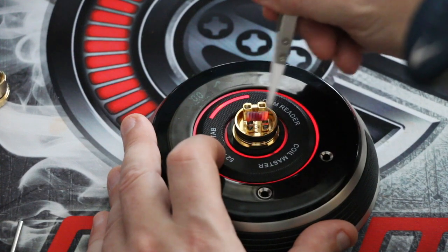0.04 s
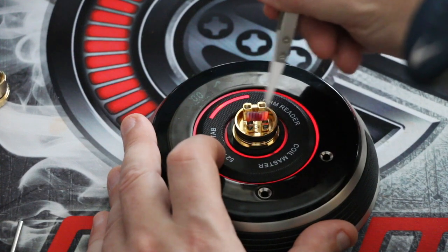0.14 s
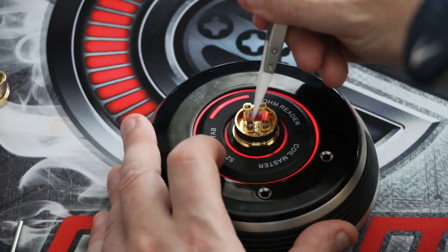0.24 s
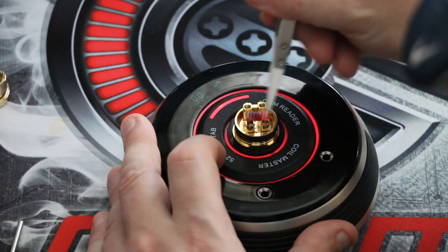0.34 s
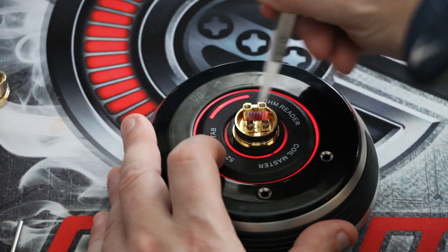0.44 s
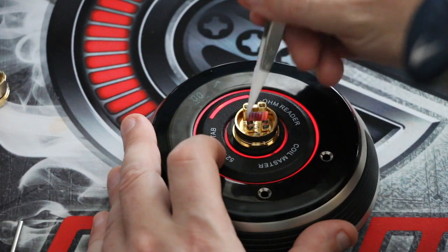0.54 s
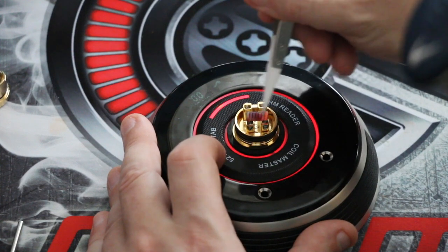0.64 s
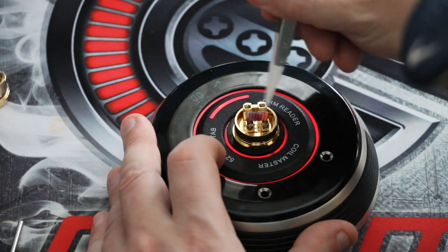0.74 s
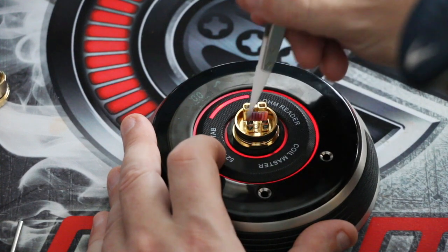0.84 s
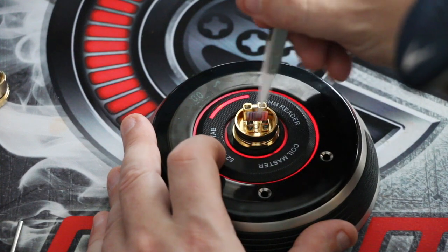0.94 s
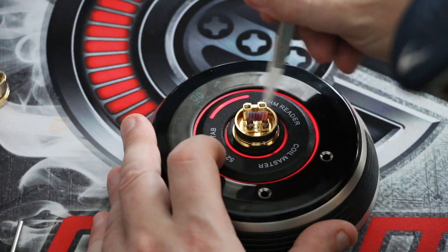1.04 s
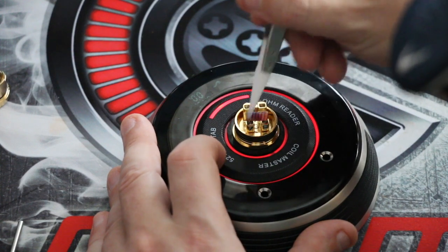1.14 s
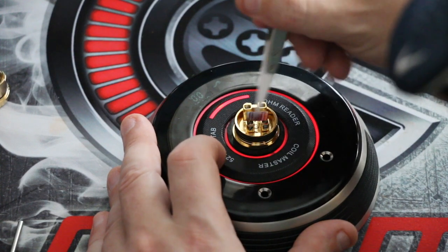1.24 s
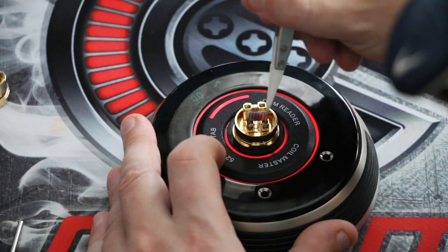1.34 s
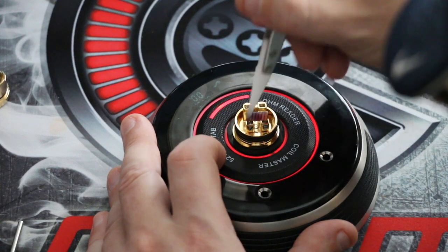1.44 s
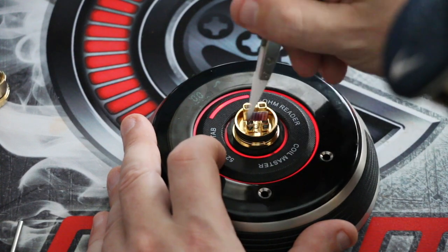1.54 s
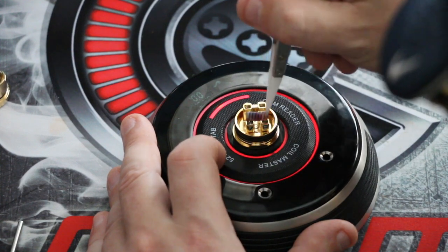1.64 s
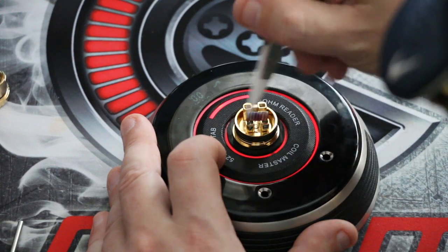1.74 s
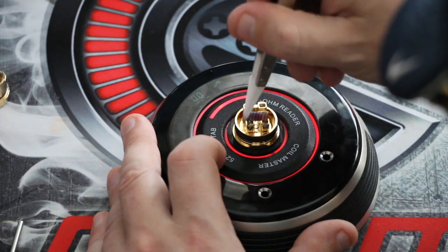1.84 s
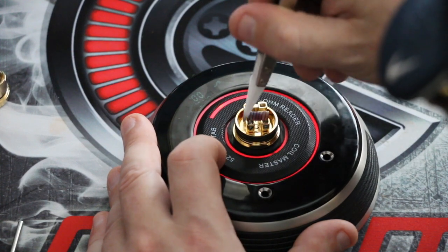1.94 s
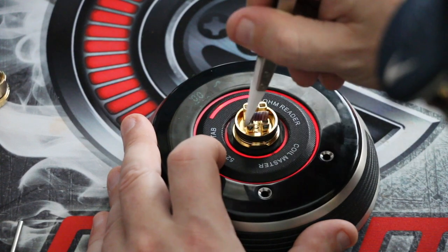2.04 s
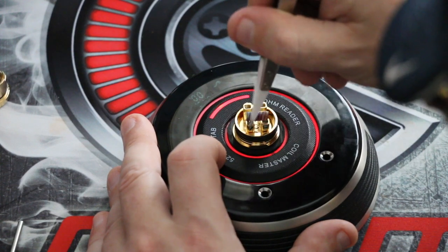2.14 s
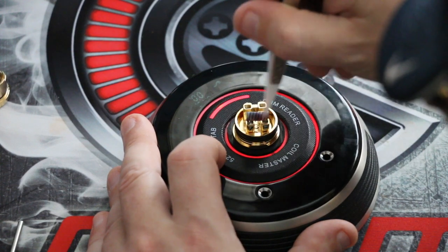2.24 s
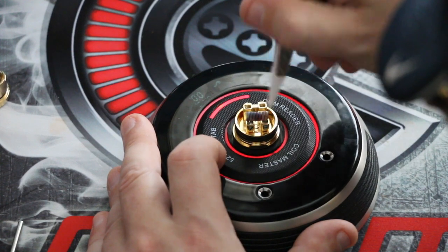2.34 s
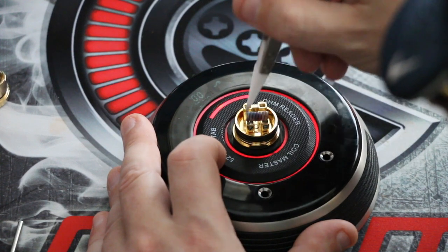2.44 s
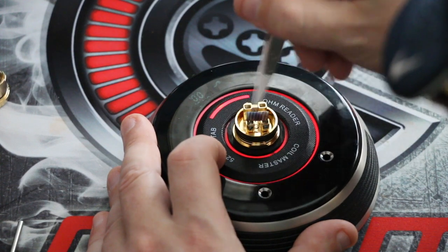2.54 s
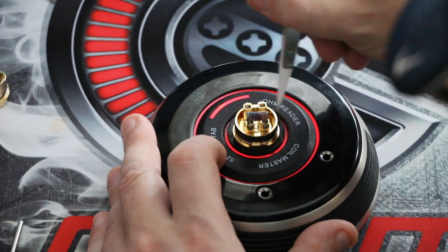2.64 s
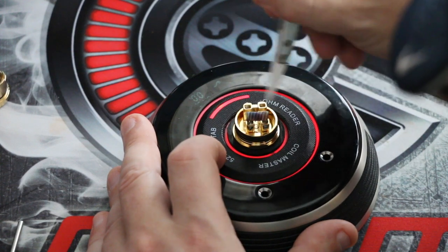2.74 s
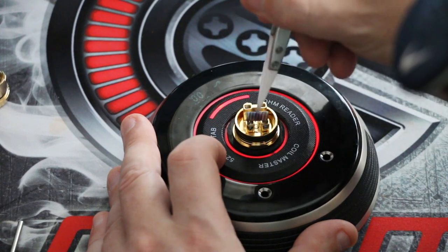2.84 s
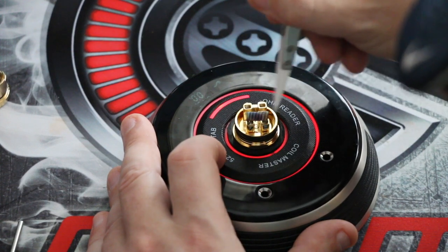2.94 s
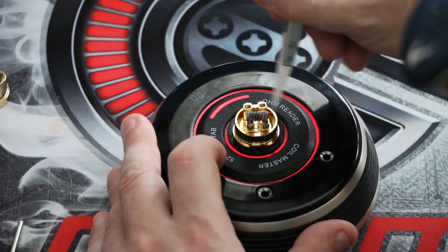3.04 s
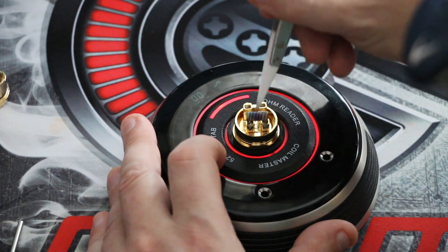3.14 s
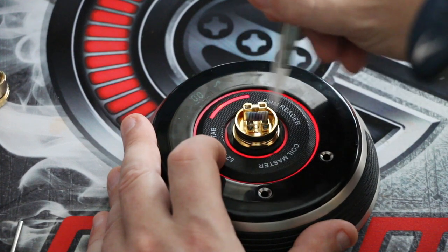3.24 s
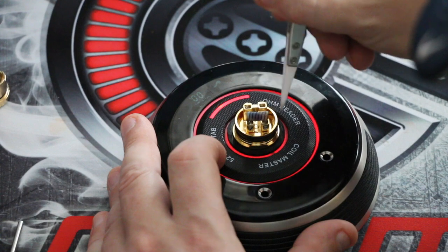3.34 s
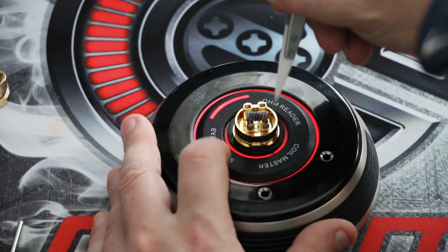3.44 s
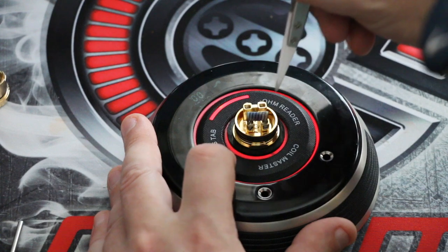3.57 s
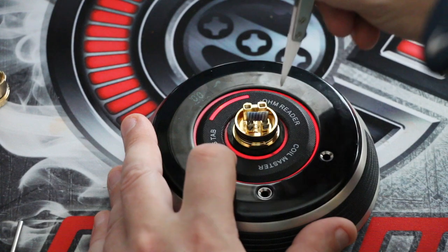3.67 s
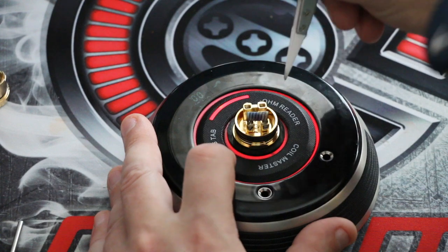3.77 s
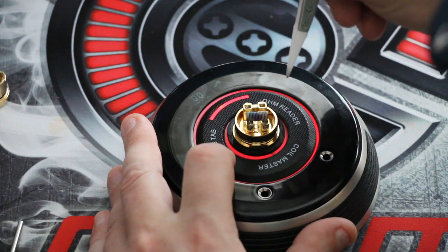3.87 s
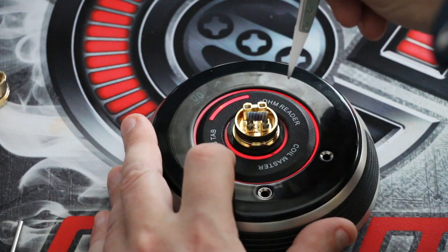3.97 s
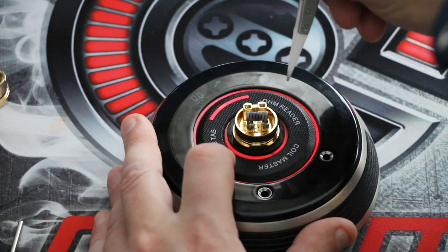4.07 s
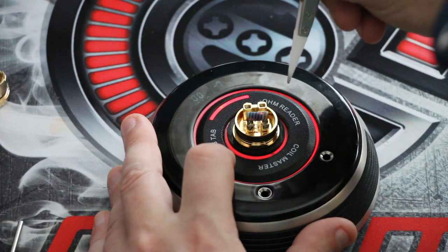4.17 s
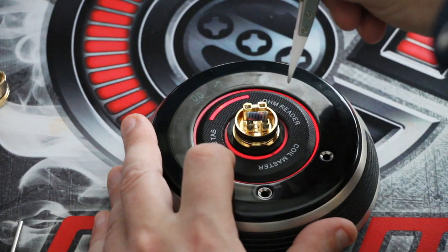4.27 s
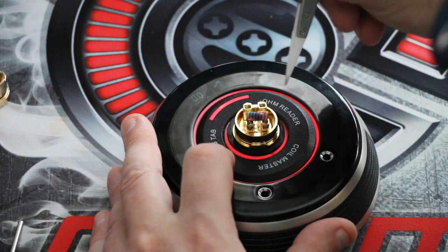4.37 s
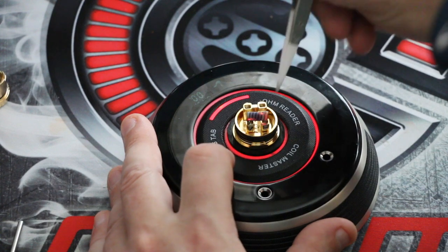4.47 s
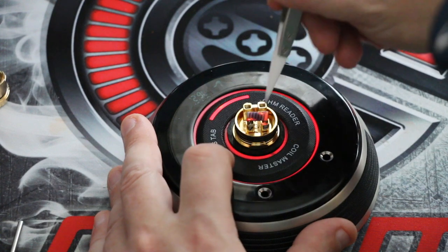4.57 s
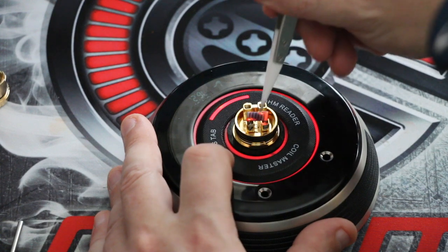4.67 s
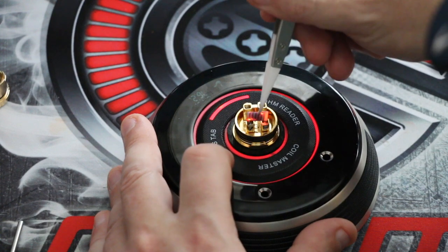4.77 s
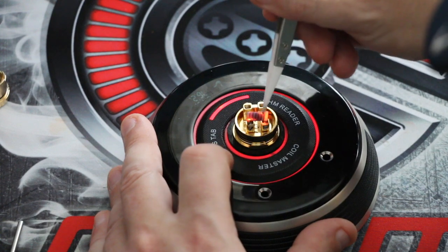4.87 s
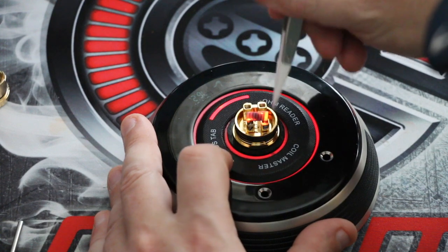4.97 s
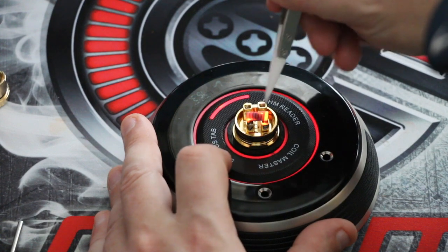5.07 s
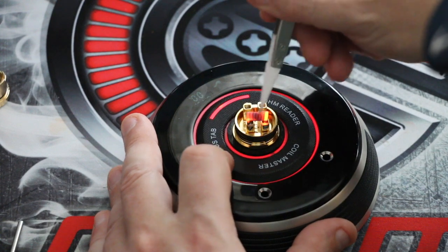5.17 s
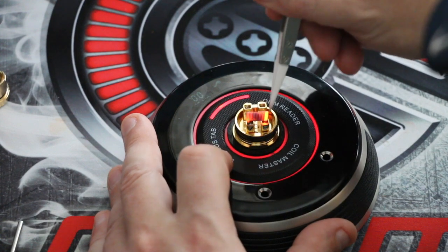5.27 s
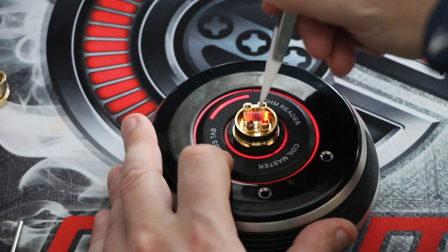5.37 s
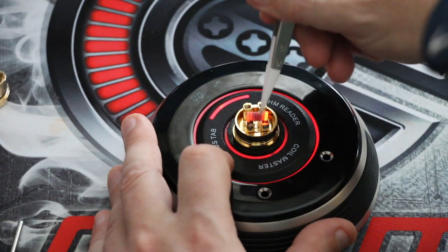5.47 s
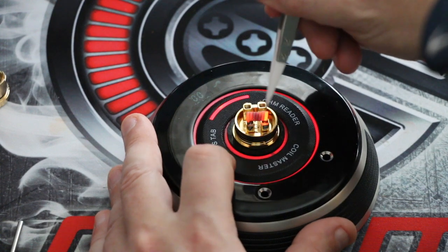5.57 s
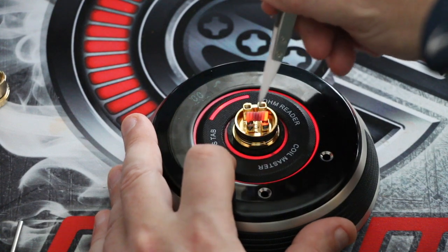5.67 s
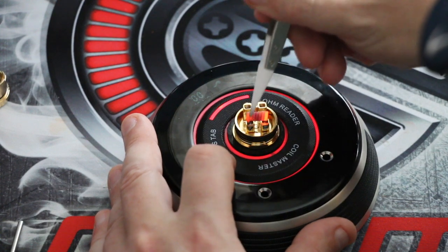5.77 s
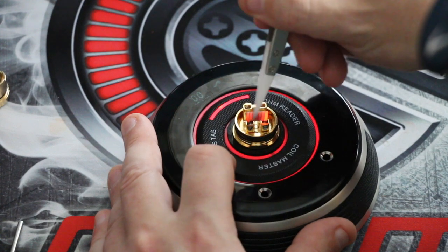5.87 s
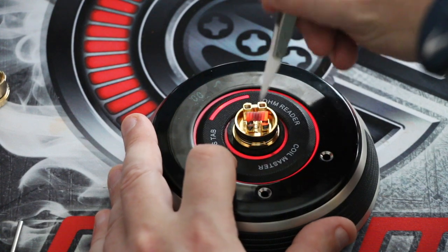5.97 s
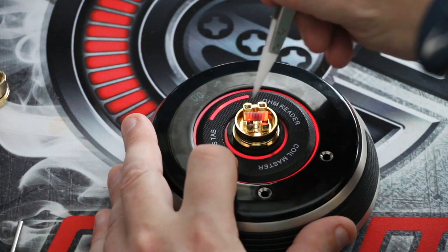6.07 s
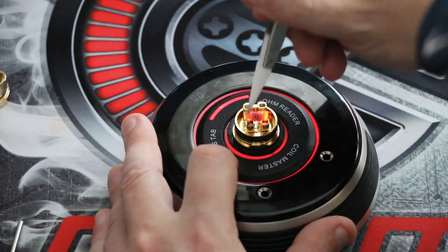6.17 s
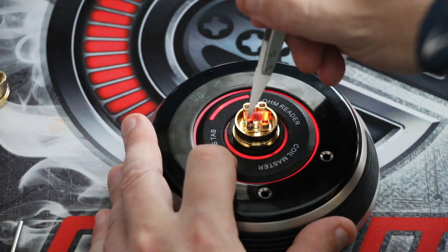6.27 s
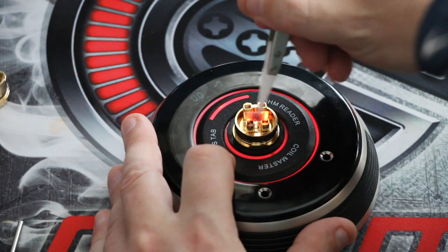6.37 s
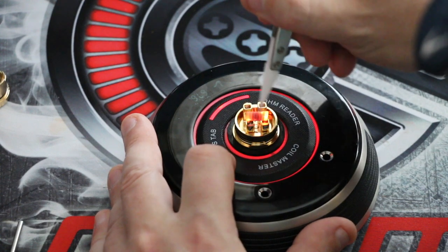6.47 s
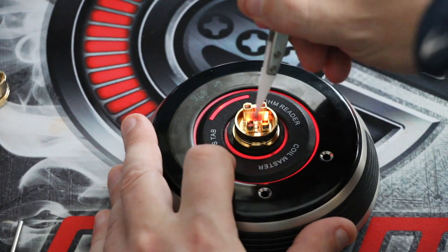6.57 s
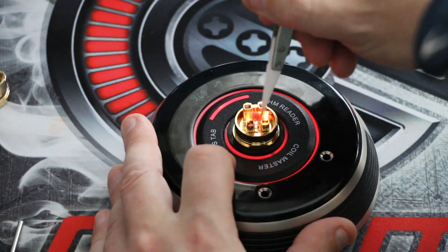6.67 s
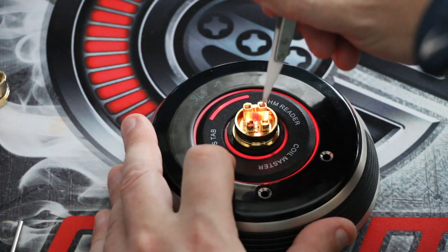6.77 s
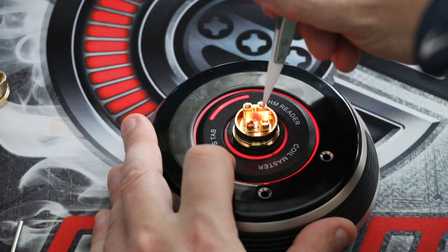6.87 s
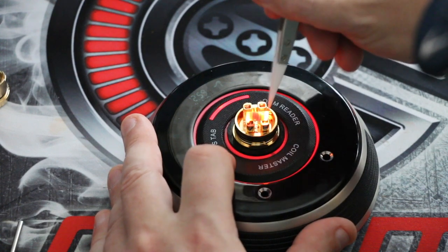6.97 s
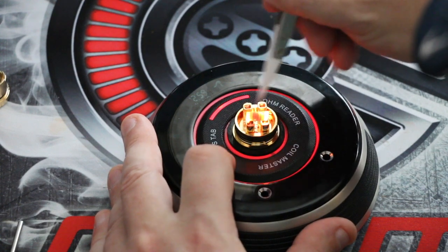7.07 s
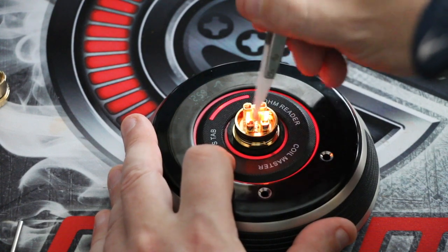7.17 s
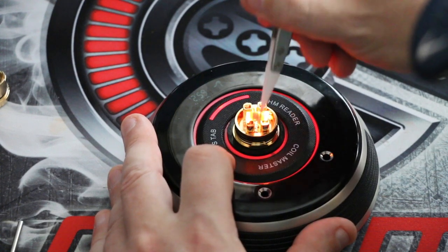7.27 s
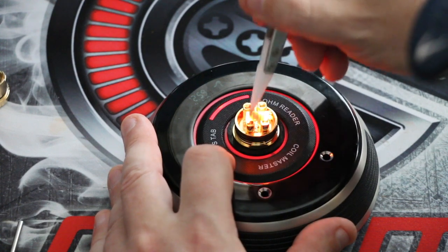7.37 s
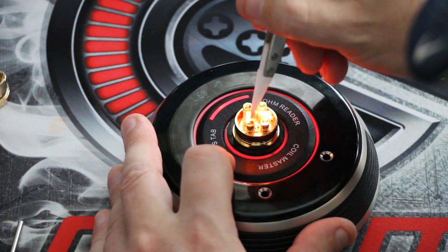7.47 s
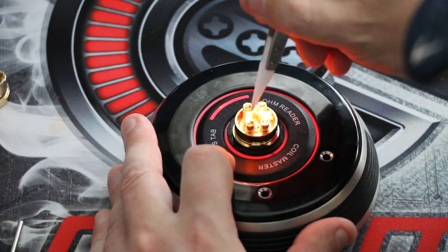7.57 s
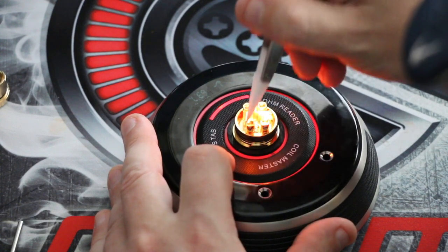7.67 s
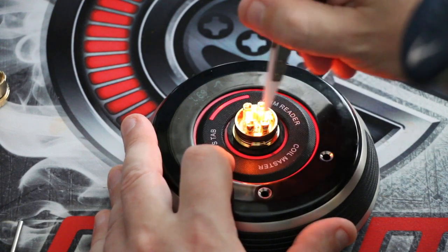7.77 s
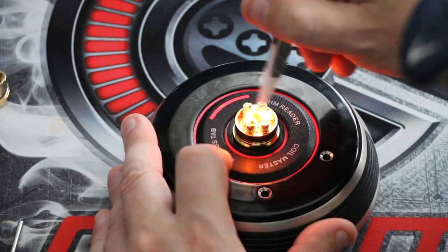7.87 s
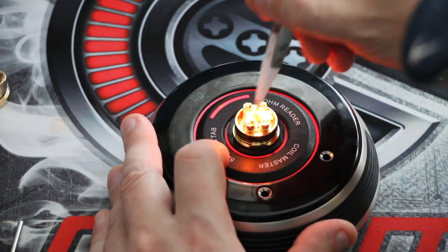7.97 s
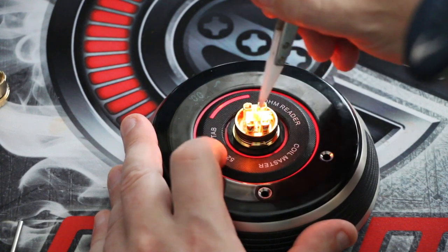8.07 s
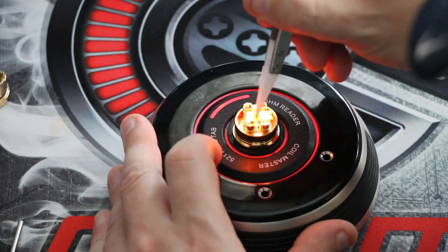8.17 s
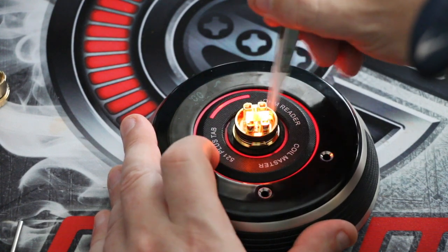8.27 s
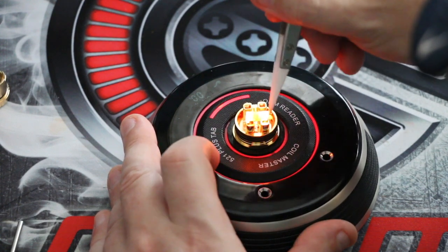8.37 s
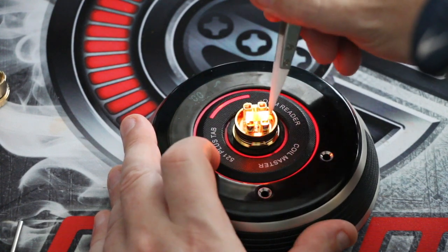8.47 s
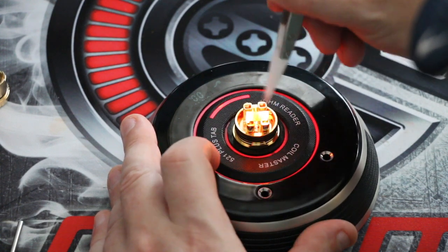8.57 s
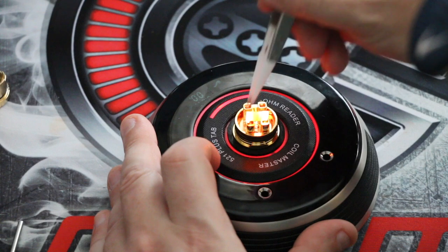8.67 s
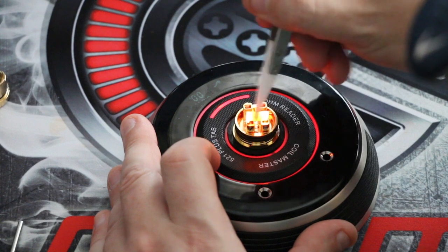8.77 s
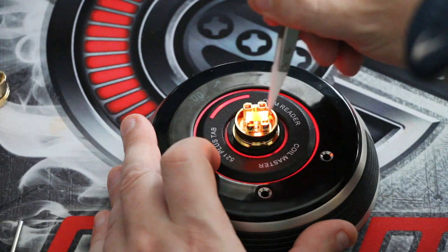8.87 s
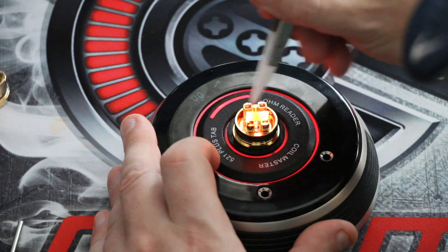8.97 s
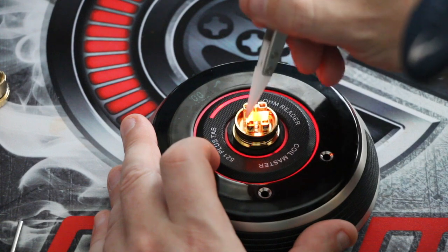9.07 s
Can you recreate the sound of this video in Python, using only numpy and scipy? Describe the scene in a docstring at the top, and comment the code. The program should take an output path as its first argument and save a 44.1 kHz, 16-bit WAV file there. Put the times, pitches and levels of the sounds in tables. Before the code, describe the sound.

Dry, gritty tick-scrape strokes repeat rapidly as tweezer tips rake a small metal coil, giving short wiry squeaks and low metallic rings. A pause of about a second and a half holds only dull finger knocks and a tiny tick. Then brighter, slightly less regular strokes return, thinning towards the end. Close microphone in a small room with faint rumble, hiss and hum.

```python
"""Small quiet room, close stereo microphone: ceramic-tipped tweezers strum a wire coil on a round firing base.
About three strokes a second with a pause midway: each taps down, skims, grips and rakes over the wraps.
Contact forces (impulses, stick-slip jerks, grit) pass through the room and the modes of wire and hollow base.
Short sagging tones, clean or rough, give wire squeaks, scrapes, low tweezer rings and a faint button tick.
A finger on the button knocks softly; shaped noise and sines give rumble, hiss and mains hum below."""
import sys
import numpy as np
from scipy import signal
from scipy.fft import rfft, irfft
from scipy.io import wavfile
from scipy.ndimage import uniform_filter1d

SR = 44100
rng = np.random.default_rng(int(sys.argv[2]) if len(sys.argv) > 2 else 0)


def wav_out(sig):
    """Save sig, one row per channel (or a flat mono array), as 16-bit PCM at SR to the path in sys.argv[1]."""
    wavfile.write(sys.argv[1], SR, np.round(np.clip(np.atleast_2d(sig).T, -1, 1) * 32767).astype(np.int16))


N = 402191

# tweezer strokes: start_s, tap_db, tap_bright_db, grip_wait_s, rake_s, rake_db, rake_bright_db, thump_db, hollow_db
STROKES = [(0.047, -35, -3.5, 0.028, 0.086, -39, -6, -6, -6.5),
           (0.323, -33.5, -6.5, .048, 0.067, -39, -2.5, -6.5, -1),
           (0.636, -38.5, 2, 0.05, 0.084, -37.5, 1, -2, 2),
           (0.976, -39.5, 5.5, 0.026, 0.1, -41, 1, -1, 2.5),
           (1.281, -38.5, 6, 0.044, 0.094, -40.5, 1, -3, -0.5),
           (1.607, -43, 3, 0.04, 0.074, -38, 5, -0.5, 0.5),
           (1.917, -39.5, 0, 0.077, 0.073, -52.5, 5, 3, -2.5),
           (2.253, -42.5, 5, .062, 0.064, -40.5, 2.5, -3, 2),
           (2.578, -38.5, -9, 0.05, 0.052, -33.5, 0, -2.5, -2.5),
           (2.936, -38, -11, 0.039, 0.025, -36.5, 3.5, 2.5, -2.5),
           (3.268, -36, -9, 0.019, 0.065, -42, 1, 2.5, -8), (4.907, -40, 1, 0.033, 0.024, -53.5, 0, 0, 2),
           (5.248, -38, 5, 0.032, 0.056, -40.5, 2.5, 4.5, 3.5),
           (5.518, -37, 2.5, 0.048, 0.066, -43.5, 3.5, 4, 6),
           (5.941, -40, 10.5, 0.015, .064, -41.5, 4, 2, 5),
           (6.397, -43.5, 4.5, .028, .075, -42.5, 2.5, -0.5, 3),
           (6.672, -42, 4, 0.034, 0.061, -41.5, 2, 1.5, 4), (6.781, -61, 0, 0.021, 0.027, -41, -1, -1, 5),
           (6.981, -45, -19, .064, 0.013, -38, -3, 3.5, -0.5),
           (7.281, -39, 12, 0.0074, .084, -43.5, 5, 3, 5), (7.509, -50, 9, 0.055, 0.039, -43.5, 2, 4, 10.5),
           (7.791, -40.5, 3.5, 0.026, .042, -39.5, 1, -0.5, 0.5),
           (8.242, -47.5, -3, .076, 0.012, -32, 1.5, -0.5, -3),
           (8.836, -41.5, -5, 0.021, 0.068, -41, -1.5, -4, -8.5)]
# tips snapping off a wrap: start_s, level_db, bright_db
SNAPS = [(0.120, -40.5, 2), (0.751, -39, 2), (1.412, -42.5, -20), (2.001, -45, 5), (2.079, -40, 7),
         (2.266, -43, 11), (2.599, -35.5, -5), (3.324, -37.5, 3.5), (3.341, -35, -3), (5.001, -42.5, 4.5),
         (5.572, -36.5, 6.5), (7.592, -34, 18), (7.607, -38, -7)]
# short squeaks, scrapes and rings, and one faint button tick in the pause:
# start_s, length_s, start_hz, level_db, roughness (0-1)
SHORT_TONES = [(0.111, 0.046, 3100, -46.5, 0.45), (0.367, 0.018, 2850, -44, 0.1),
               (.412, 0.028, 3160, -47.5, 0.52), (.688, 0.025, 2870, -40, .55),
               (0.745, 0.028, 3230, -45, 0.36), (1.121, .02, 3480, -42.5, 0.5),
               (1.305, 0.023, 2764, -45, .5), (1.642, 0.026, 2340, -36.5, 0.24),
               (1.726, 0.037, 3220, -51, .36), (1.924, .009, 14100, -48.5, .2),
               (2.022, 0.04, 2410, -50, .1), (2.076, 0.026, 1390, -46, 0.14),
               (2.497, 0.077, 5220, -64, 0.96), (2.55, .035, 4200, -61, .95),
               (2.963, .021, 2753, -36.5, 0.28), (2.993, 0.067, 1360, -55.5, 0.2),
               (4.16, .012, 4000, -60.5, .9), (4.944, 0.024, 2920, -52.5, .4),
               (5.311, .025, 3140, -45.5, 0.35), (5.514, 0.021, 1360, -46, 0.2),
               (5.563, 0.044, 3220, -45.5, 0.52), (5.63, 0.066, 1326, -55.5, 0.3)]
# fingers on button and base: start_s, level_db, thump_db
KNOCKS = [(3.166, -52.5, 26), (3.623, -43.5, 19), (3.864, -53.5, 10), (4.16, -55, -2), (4.809, -49, 8),
          (4.876, -51, -13), (6.227, -54, 33), (8.427, -46.5, -9), (8.46, -56, 17), (8.568, -47.5, -4)]
# broad colour of base and coil: freq_hz, density_db_per_hz
BODY_COLOUR = [(25, -26), (65, -16.5), (170, -10.5), (400, -4.5), (480, 3), (900, -6), (1050, -10.5),
               (1800, -13.5), (3200, -12), (3900, -21.5), (6000, -25.5), (10000, -25), (15500, -30.5)]
# resonances and hollows of base, posts and wire: freq_hz, width_hz, gain_db
BODY_MODES = [(68, 21, 12.5), (176, 25, 8.5), (311, 35, 8.5), (476.8, 20.2, 2.5), (552.6, 75, 4),
              (663, 32, -0.5), (696, 19, 3.5), (870, 116, 7), (1197, 29, -14.5), (1256, 16, 11),
              (1450, 95, 7), (1640, 36, 5.5), (2045, 66, 8), (2202, 38, 12), (2320, 97, 5.5), (2740, 39, 7),
              (2697, 21, -11.5), (2920, 18, 11), (3082, 110, 1.5), (3620, 80, -0.5), (3960, 200, 5),
              (4600, 56, 11), (5240, 150, 8.5), (5820, 88, 4), (7500, 390, 4.5), (10200, 71, -8)]
# extra wire response under raking: freq_hz, width_hz, gain_db
RAKE_MODE = (3260, 370, 3.2)
# centres of thump, unchanged middle, ring and edge: freq_hz
COLOUR_HZ = (250, 700, 2300, 6500)
# contact colours at zero thump and brightness: thump_db, ring_db, edge_db
TAP_COLOUR_DB = (-0.54, 0.5, -0.34)
RAKE_COLOUR_DB = (0.36, 2.77, -2.5)
KNOCK_COLOUR_DB = (1.9, -2.2, -6)
# room decay: freq_hz, t60_s
ROOM_T60 = [(100, 0.28), (400, 0.27), (1000, 0.2), (2800, 0.22), (7000, 0.22), (15000, 0.14)]
# left-right likeness of the room: freq_hz, likeness (0-1)
ROOM_LIKENESS = [(100, 1), (500, 0.98), (1400, 0.91), (2800, 0.64), (5000, 0.39), (12000, 0.39)]
# relative spectrum of rumble and hiss: freq_hz, density_db_per_hz
FLOOR_SPECTRUM = [(12, -46), (20, -35), (49, -7), (85, -12), (122, 0.5), (149, -17), (181, -6.5),
                  (383, -10), (708, -11), (770, -10), (1140, -12.5), (1980, -15), (2160, -15),
                  (6580, -19.5), (15600, -26)]
# left-right likeness of rumble and hiss: freq_hz, likeness (0-1)
FLOOR_LIKENESS = [(50, 1), (300, 0.27), (1000, 0.41), (2500, 0.054), (6000, 0.018), (15000, 0.06)]
# mains hum: freq_hz, level_db
HUM = [(119, -76), (180, -85)]

SIZE = 32768  # FFT length, samples
HZ = np.fft.rfftfreq(SIZE, 1 / SR)
TIME_S = np.arange(SIZE // 2) / SR

SKIM_MAX_DB, SKIM_UNDER_RAKE_DB, SKIM_FADE_DB = -51.5, 1, 6
SKIM_SHARE = 0.89  # of the wait for the grip; then the tips stick
GRIP_RE_RAKE_DB = -3.5
RASP_UNTIL_S, RASP_HZ, RASP_DB, RASP_ROUGHNESS = 2.5, 5390, -57.5, 1
RASP_FROM = 0.35  # share of the rake length
TONE_SAG = 0.06  # share of pitch lost by a clean tone; rough ones sag less
HOLLOW_HZ, HOLLOW_WIDTH_HZ = 498, 155
FLOOR_DB = -57
EDGE_HZ = 15800


def tweezers(tap_s=0.0096):
    """Strokes land, skim, grip with a jerk and rake; snaps ring the body of the latest stroke."""
    mix = np.zeros((2, N))
    for start_s, tap_db, tap_bright_db, wait_s, rake_s, rake_db, rake_bright_db, thump_db, hollow_db in STROKES:
        body_db = body(hollow_db)
        tap_colour = colour(TAP_COLOUR_DB, thump_db, tap_bright_db)
        skim_colour = colour(TAP_COLOUR_DB, thump_db, 0)
        rake_colour = colour(RAKE_COLOUR_DB, thump_db, rake_bright_db)
        grip_s = start_s + wait_s

        add(mix, start_s, ring(tap(bounce=0.48, bounce_s=0.004), body_db, tap_s, tap_db, *tap_colour))

        skim_s = SKIM_SHARE * wait_s
        skim_db = min(SKIM_MAX_DB, rake_db - SKIM_UNDER_RAKE_DB)
        skim_force = rake(skim_s) * amp(-SKIM_FADE_DB * np.minimum(TIME_S / skim_s, 1))
        add(mix, start_s, ring(skim_force, body_db, skim_s, skim_db, *skim_colour))

        grip_force = tap(bounce=1.0, bounce_s=0.003)
        add(mix, grip_s, ring(grip_force, body_db, tap_s, rake_db + GRIP_RE_RAKE_DB, *rake_colour))
        add(mix, grip_s, ring(rake(rake_s), body_db + peak(*RAKE_MODE), rake_s, rake_db, *rake_colour))

        if start_s < RASP_UNTIL_S:  # early rakes rasp thinly
            rasp = short_tone((1 - RASP_FROM) * rake_s, RASP_HZ, RASP_DB, RASP_ROUGHNESS)
            add(mix, grip_s + RASP_FROM * rake_s, rasp)

    for start_s, level_db, bright_db in SNAPS:
        *_, hollow_db = [stroke for stroke in STROKES if stroke[0] < start_s][-1]
        snap_force = tap(bounce=0.25, bounce_s=0.004)
        snap_colour = colour(TAP_COLOUR_DB, 0, bright_db)
        add(mix, start_s, ring(snap_force, body(hollow_db), tap_s, level_db, *snap_colour))
    return mix


def tap(bounce, bounce_s):
    """Contact impulse and one bounce, its delay varied by up to 40 %."""
    force = np.zeros(len(TIME_S))
    force[0] = 1
    force[1 + int(bounce_s * SR * rng.uniform(0.6, 1.4))] = bounce
    return force


def rake(length_s, slips_per_s=900, spread_db=3, grit_db=-2):
    """Random stick-slip jerks and fine grit, bunched where the tips cross a wrap."""
    size, way, grit = rng.standard_normal((3, len(TIME_S)))
    slipping = rng.random(len(TIME_S)) < slips_per_s / SR
    slips = slipping * np.sign(way) * amp(spread_db * size)
    friction = evened(slips) + amp(grit_db) * grit
    return friction * wraps() * (TIME_S < length_s)


def wraps(wraps_per_s=68, uneven=0.22, catch_s=0.0025, between_db=-15):
    """Contact pressure: a hard catch on each turn decays to a light skate, at uneven spacing and strength."""
    gap, size = rng.standard_normal((2, 40))
    gaps_s = np.exp(uneven * gap) / wraps_per_s
    starts_s = np.cumsum(gaps_s) - gaps_s
    last = np.searchsorted(starts_s, TIME_S, side="right") - 1
    catch = np.exp(uneven * size[last] - (TIME_S - starts_s[last]) / catch_s)
    return amp(between_db) + catch


def squeaks_and_rings():
    """Squeaks of the wire, scrapes, low rings of the tweezers and one faint button tick, all as short tones."""
    mix = np.zeros((2, N))
    for start_s, *tone in SHORT_TONES:
        add(mix, start_s, short_tone(*tone))
    return mix


def short_tone(length_s, start_hz, level_db, roughness, waver=0.015, octave_db=-25, chatter_hz=240):
    """Swelling, sagging, wavering tone with a weak octave; random chatter roughens it towards a rasp."""
    wobble, a, b = rng.standard_normal((3, len(TIME_S)))
    wobble = evened(uniform_filter1d(wobble, size=90))
    progress = np.minimum(TIME_S / length_s, 1)
    sag = TONE_SAG * (1 - roughness) * progress
    pitch_hz = start_hz * (1 - sag) * (1 + waver * wobble)
    turn = np.exp(2j * np.pi * np.cumsum(pitch_hz) / SR)

    chatter = signal.lfilter(*signal.butter(2, chatter_hz, fs=SR), (a + 1j * b) * wraps())
    roughness = np.clip(roughness, 0, 1)
    note = turn * (1 - roughness + roughness * chatter / np.std(chatter))
    octave = amp(octave_db) * (start_hz < SR / 4) * note * turn  # only where it stays below Nyquist
    swell = np.sqrt(np.maximum(np.sin(np.pi * progress), 0))
    tone = swell * (note + octave).real
    return heard(rfft(tone, SIZE) * room(direct_db=-1, near_db=-17.5, far_db=-5.5), length_s, level_db)


def fingers(knock_s=0.0088):
    """Soft knocks on button and base: an impulse with a late bounce, in a dull colour."""
    mix = np.zeros((2, N))
    for start_s, level_db, thump_db in KNOCKS:
        force = tap(bounce=0.48, bounce_s=0.019)
        knock_colour = colour(KNOCK_COLOUR_DB, thump_db, 0)
        add(mix, start_s, ring(force, body(0), knock_s, level_db, *knock_colour))
    return mix


def ring(force, body_db, seconds, level_db, thump_db, ring_db, edge_db):
    """A contact force through room and body; body and place of contact set the broad colour."""
    drive = rfft(force, SIZE) * room()
    smooth_power = uniform_filter1d(abs(drive.mean(0)) ** 2, size=200)
    drive = drive / np.sqrt(smooth_power + 1e-12)  # leaves only fine ripple
    colour_db = read(list(zip(COLOUR_HZ, (thump_db, 0, ring_db, edge_db))), HZ)
    return heard(drive * causal(body_db + colour_db), seconds, level_db)


def body(hollow_db):
    """Response of base and coil in dB: broad colour, modes and the cavity of the base."""
    modes_db = sum(peak(*mode) for mode in BODY_MODES)
    return read(BODY_COLOUR, HZ) + modes_db + peak(HOLLOW_HZ, HOLLOW_WIDTH_HZ, hollow_db)


def peak(freq_hz, width_hz, gain_db):
    """One resonance or hollow as a bump or dip in dB."""
    return gain_db / (1 + (2 * (HZ - freq_hz) / width_hz) ** 2)


def colour(kind_db, thump_db, bright_db):
    """Thump, ring and edge of a contact; brightness lifts ring and edge together."""
    return np.add(kind_db, (thump_db, bright_db, bright_db))


def causal(gain_db):
    """Minimum-phase spectrum: it rings only after the blow."""
    log_gain = np.log(amp(np.concatenate([gain_db, gain_db[-2:0:-1]])))
    return np.exp(np.conj(signal.hilbert(log_gain)))[:len(gain_db)]


def room(direct_db=-8, near_db=0, near_t60_s=0.039, near_build_s=0.001, far_db=-3, far_build_s=0.0018):
    """Direct path, quick scatter off table and hands, and a tail decaying by frequency."""
    hz, t_s, near_z = noise_pair(ROOM_LIKENESS, len(TIME_S))
    far_z = 1j * near_z * amp(-60 * t_s / read(ROOM_T60, hz))  # quarter-turn sets it apart from the scatter
    near, far = signal.istft(np.array([near_z, far_z]), nperseg=512)[1][..., :len(TIME_S)]
    near = near * amp(-60 * TIME_S / near_t60_s) * (1 - np.exp(-TIME_S / near_build_s))
    far = far * (1 - np.exp(-TIME_S / far_build_s))
    paths = (amp(near_db) * evened(near) + amp(far_db) * evened(far)) / np.sqrt(len(TIME_S))
    paths[:, 0] += amp(direct_db)
    return rfft(paths, SIZE)


def noise_pair(likeness, size):
    """Short-time noise spectra at two nearby microphones: mid and side weighted by likeness."""
    hz, t_s, (mid, side) = signal.stft(rng.standard_normal((2, size)), SR, nperseg=512)
    same = np.clip(read(likeness, hz), -1, 1)[:, None]
    mid = mid * np.sqrt((1 + same) / 2)
    side = side * np.sqrt((1 - same) / 2)
    return hz[:, None], t_s, np.array([mid + side, mid - side])


def heard(spectrum, seconds, level_db):
    """Stereo sound whose mono energy equals level_db held for that many seconds."""
    sound = irfft(spectrum)[:, :len(TIME_S)]
    return amp(level_db) * sound * np.sqrt(seconds * SR / np.sum(sound.mean(0) ** 2))


def amp(db):
    """Decibels to gain."""
    return 10 ** (np.asarray(db) / 20)


def evened(x):
    """Scales to an rms of one."""
    return x / np.sqrt(np.mean(x ** 2) + 1e-20)


def read(points, hz):
    """Interpolates a table on a log-frequency axis."""
    freq_hz, value = np.transpose(points)
    return np.interp(np.log(hz + 1), np.log(freq_hz + 1), value)


def add(mix, start_s, sound):
    """Adds a stereo sound at its time, cut at the end of the mix."""
    part = mix[:, max(round(start_s * SR), 0):][:, :sound.shape[1]]
    part += sound[:, :part.shape[1]]


def background(hum_waver_rad=0.36):
    """Room rumble and microphone hiss as shaped noise, plus mains hum with slowly drifting phase."""
    hiss = signal.istft(noise_pair(FLOOR_LIKENESS, N)[2], nperseg=512)[1][:, :N]
    hiss = irfft(rfft(hiss) * amp(read(FLOOR_SPECTRUM, np.fft.rfftfreq(N, 1 / SR))), N)
    t_s = np.arange(N) / SR
    drift = evened(uniform_filter1d(uniform_filter1d(rng.standard_normal(N), 5000), 3000))
    hum = sum(amp(level_db) * np.sqrt(2) * np.sin(2 * np.pi * freq_hz * t_s + hum_waver_rad * drift)
              for freq_hz, level_db in HUM)
    return amp(FLOOR_DB) * evened(hiss) + hum


def scene(left_db=0.14):
    """All contacts and tones just left of centre, over the background."""
    contacts = tweezers() + squeaks_and_rings() + fingers()
    return contacts * amp([[left_db], [-left_db]]) + background()


def record(dry):
    """Band limit of the recorder: a steep linear-phase low-pass."""
    lowpass = signal.firwin(511, EDGE_HZ, window=("kaiser", 9), fs=SR)
    return signal.oaconvolve(dry, lowpass[None], "same", axes=1)


dry = scene()
out = record(dry)
wav_out(out)
```